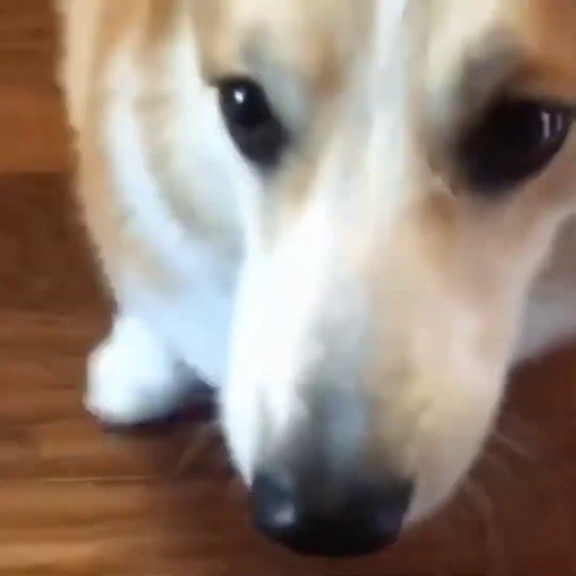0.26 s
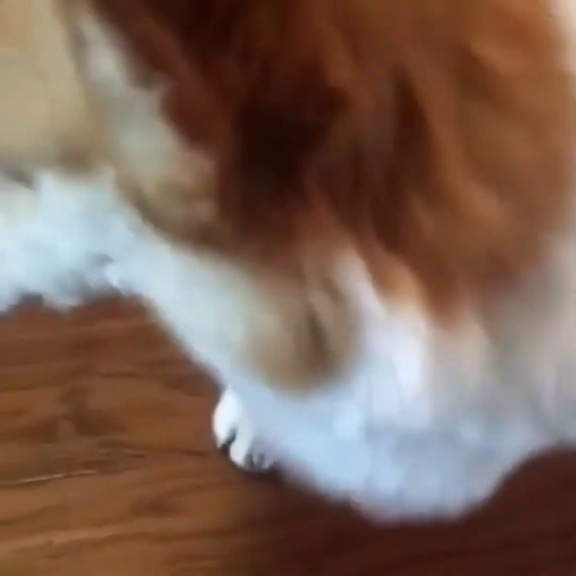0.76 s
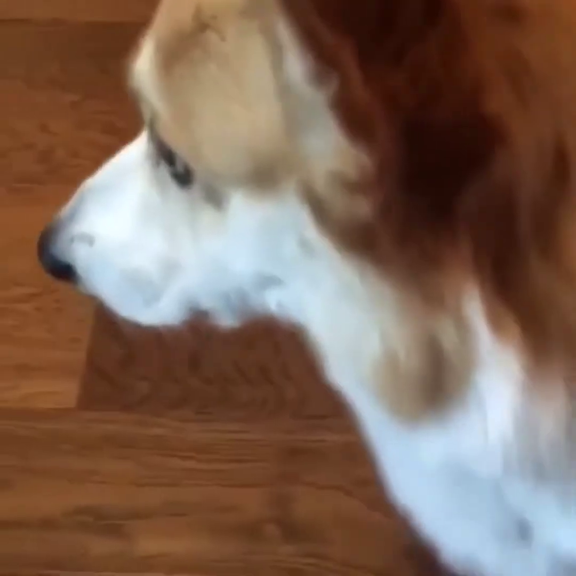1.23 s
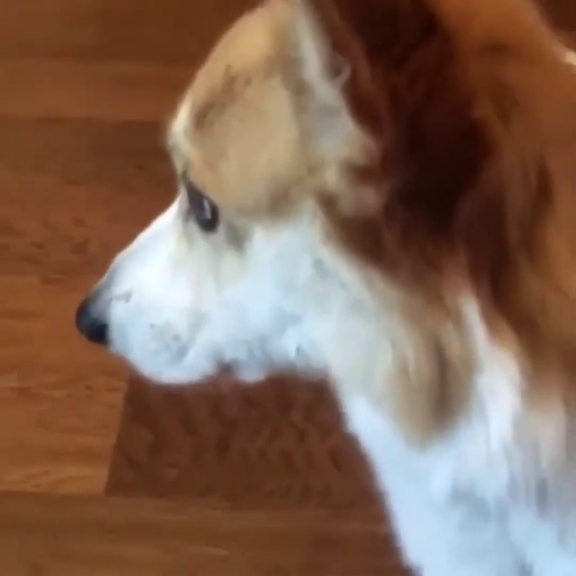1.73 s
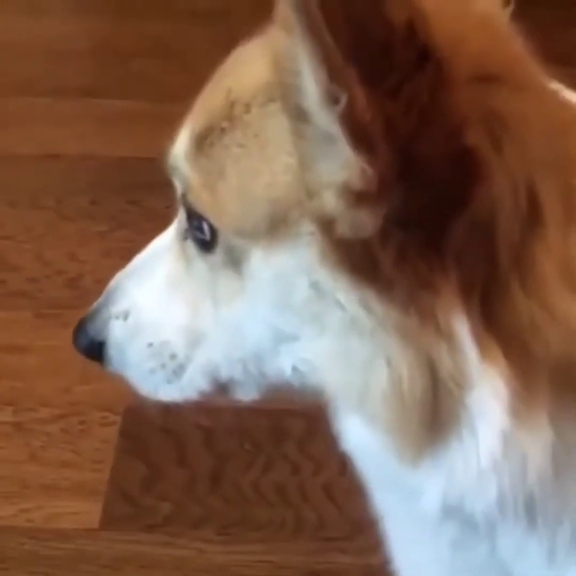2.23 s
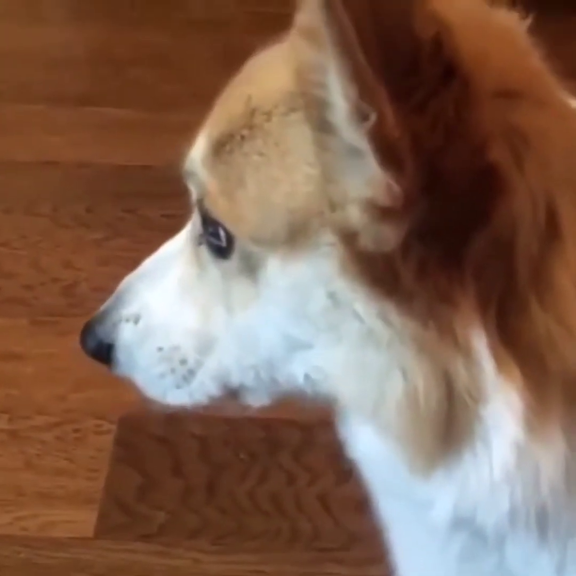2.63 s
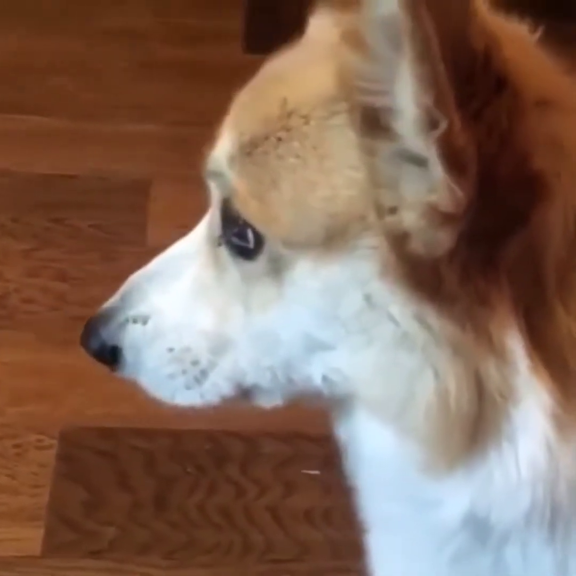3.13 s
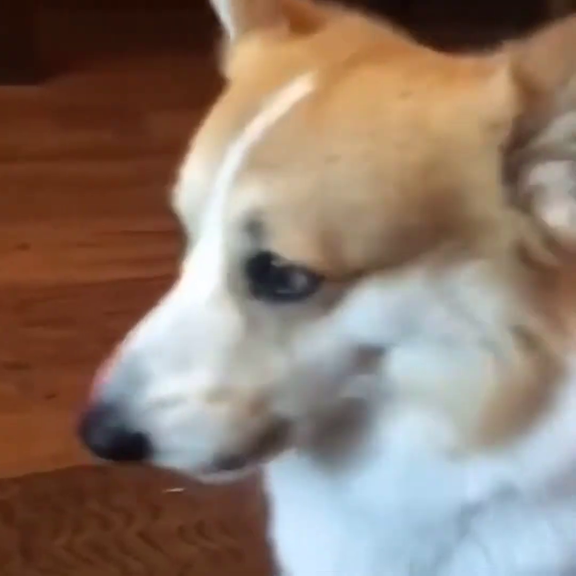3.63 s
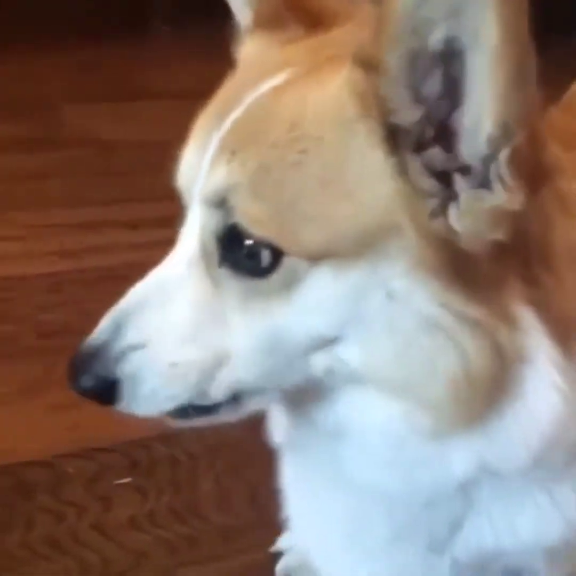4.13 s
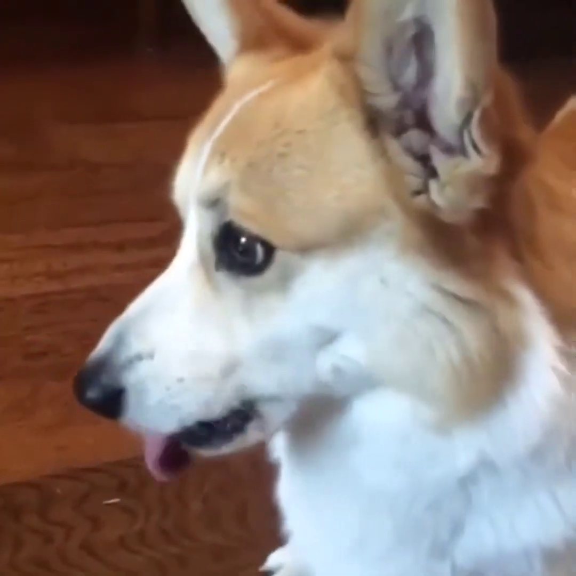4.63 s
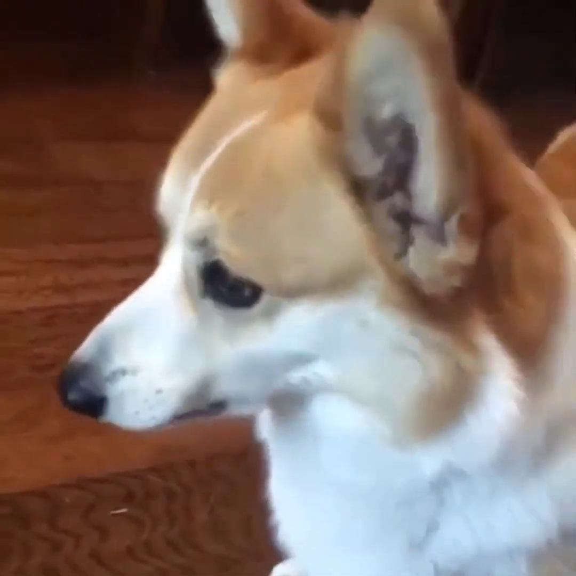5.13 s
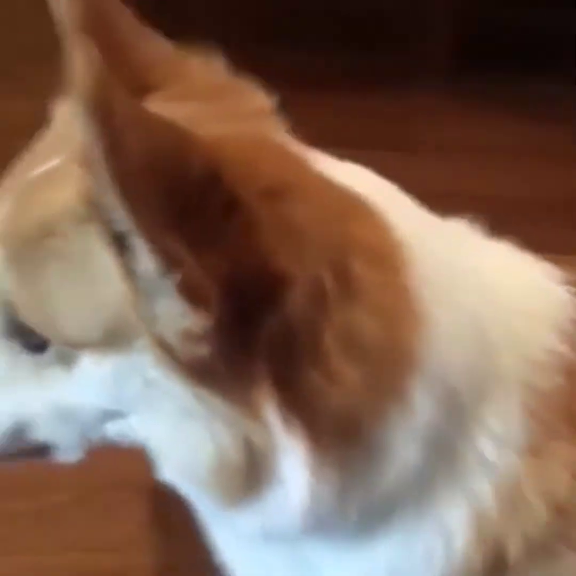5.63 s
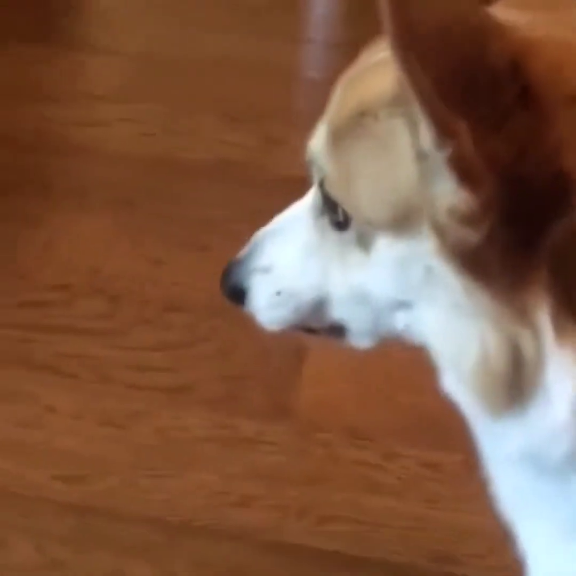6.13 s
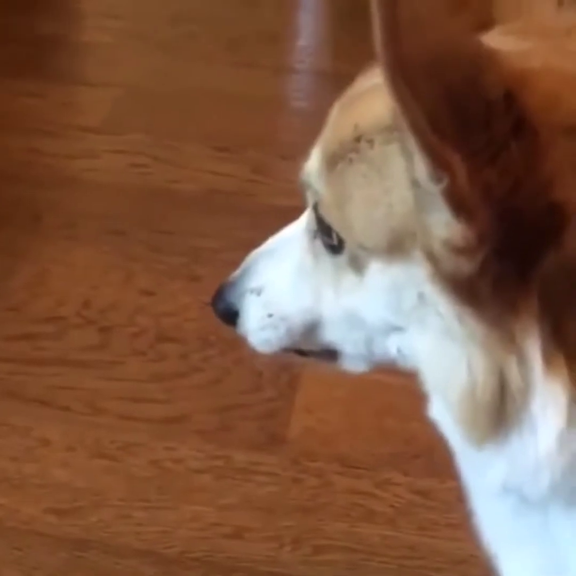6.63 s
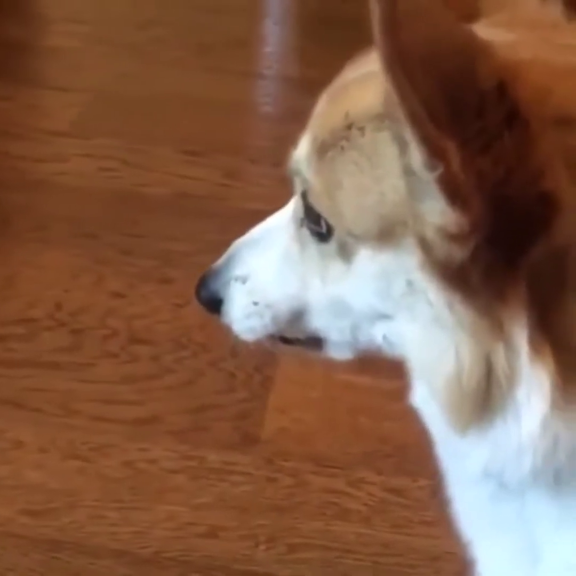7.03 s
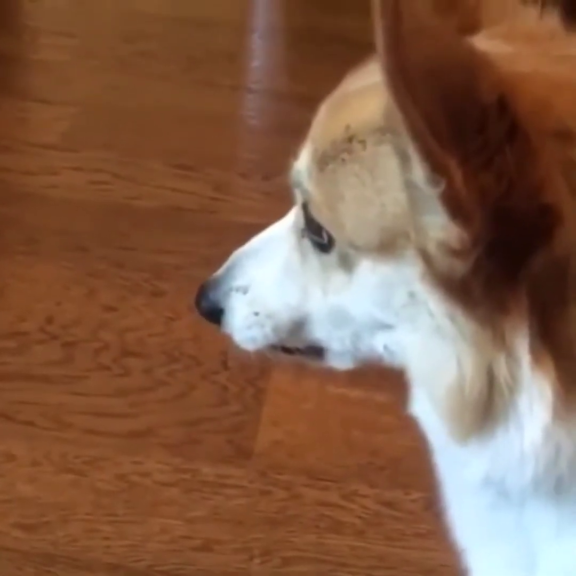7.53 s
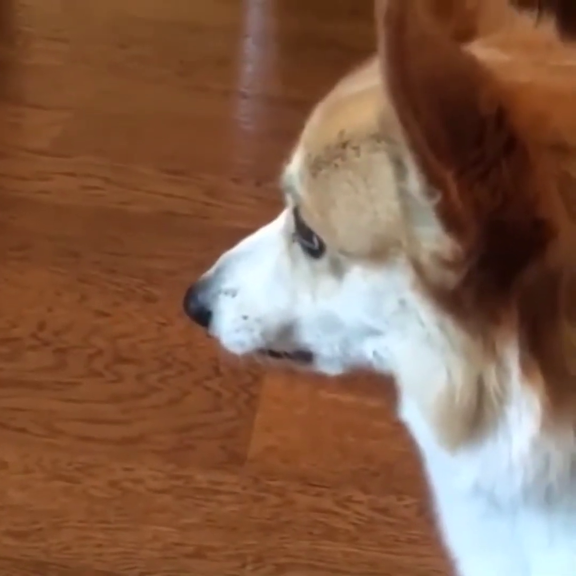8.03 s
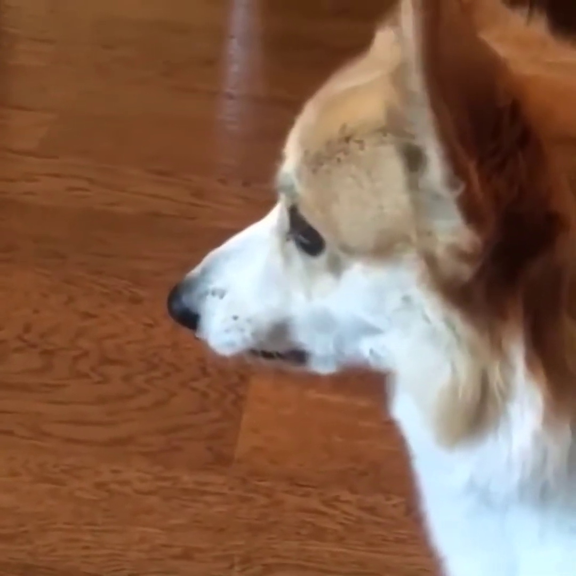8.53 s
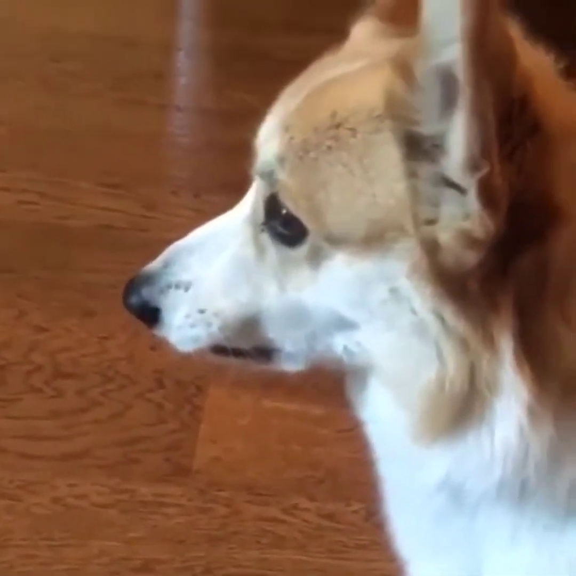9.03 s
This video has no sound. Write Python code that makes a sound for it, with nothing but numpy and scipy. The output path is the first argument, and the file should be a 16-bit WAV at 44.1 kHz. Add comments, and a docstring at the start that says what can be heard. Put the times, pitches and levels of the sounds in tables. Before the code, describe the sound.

A pet feeder motor whines and rumbles while dry kibble cracks and patters in waves into a steel bowl, then stops, leaving a quiet room.

```python
"""A motor whines and rumbles in its plastic housing as a pet feeder runs across a hard-floored room.
From the start dry food cracks in the wheel, slides down the chute in waves and patters into a steel bowl.
The motor stops, the last pieces drop and the quiet room is left with a far low rumble.
Noise bursts make the food, ringing modes the bowl, shaft-locked tones the whine, shaped noise the rest."""
import sys
import numpy as np
from scipy import signal
from scipy.fft import rfft, irfft
from scipy.io import wavfile
from scipy.ndimage import uniform_filter1d

SR = 44100
rng = np.random.default_rng(int(sys.argv[2]) if len(sys.argv) > 2 else 0)


def materialize(psi):
    """Save the field psi as 16-bit PCM at rate SR to the path in sys.argv[1].

    A 1-D psi becomes a single channel; in a 2-D psi each row is a channel.
    """
    bounded = np.clip(np.atleast_2d(psi).T, -1, 1)
    quanta = np.round(bounded * 32767).astype(np.int16)
    wavfile.write(sys.argv[1], SR, quanta)


N = 408800
T = np.arange(N) / SR
MOTOR_OFF_S = 6.955

# ringing modes of the steel bowl: mode_hz [Hz], level_db [dB], t60 [s to -60 dB]
BOWL_MODES = [(580, -14.5, 0.13), (1060.6, -8, 0.04), (1765, -11, 0.07), (2324, -2, 0.065),
              (3003, -4.5, 0.02), (4000, -10, 0.05), (4220, -5.5, 0.04), (4664, -8.5, 0.01),
              (5070, -10, 0.0251), (6320, -11, 0.04), (6550, -15.5, .1), (6885, -16, 0.01)]
# resonances of the plastic housing: centre_hz [Hz], width_hz [Hz], level_db [dB]
HOUSING_MODES = [(100, 34, -3.5), (165, 39.4, 0), (250, 51, 0), (374, 46.5, -8), (600, 104, -9)]


def undb(db):
    """Turn dB into gain."""
    return 10 ** (np.asarray(db) / 20)


def unit(x):
    """Scale to rms 1."""
    return x / np.sqrt(np.mean(x ** 2))


def curves(table):
    """Draw each column after the first as a signal in time."""
    s, *columns = np.transpose(table)
    return [np.interp(T, s, column) for column in columns]


def band(x, lo_hz, hi_hz):
    """Keep one band of the sound."""
    edges = [lo_hz, min(hi_hz, .45 * SR)]
    return signal.sosfilt(signal.butter(2, edges, "band", fs=SR, output="sos"), x)


def colour(x, table):
    """Shape the spectrum by (Hz, dB) points, joined over log frequency."""
    hz, db = np.transpose(table)
    bins = np.maximum(np.fft.rfftfreq(x.shape[-1], 1 / SR), 1)
    gain = undb(np.interp(np.log(bins), np.log(hz), db))
    return irfft(rfft(x) * gain, x.shape[-1])


def ring(x, hz, t60):
    """Ring one mode; a unit blow starts it at amplitude 1."""
    r = np.exp(-np.log(1000) / (t60 * SR))
    w = 2 * np.pi * hz / SR
    return signal.lfilter([np.sin(w)], [1, -2 * r * np.cos(w), r * r], x)


def walk(rate):
    """Drift between random levels, each held 1 / rate s and smoothed twice."""
    k = int(SR / rate)
    steps = np.repeat(rng.standard_normal(N // k + 1), k)
    return uniform_filter1d(uniform_filter1d(steps, k), k)[:N]


def blows(times, sizes, contact_s):
    """Strike a short dying burst of noise at each time."""
    marks = np.zeros(N)
    np.add.at(marks, (np.asarray(times) * SR).astype(int), sizes)
    envelope = signal.lfilter([1], [1, -np.exp(-1 / (contact_s * SR))], marks)
    return envelope * rng.standard_normal(N)


def parts(x):
    """Split a clatter into body and treble, each near rms 1."""
    # spectrum of dry food pattering: freq_hz [Hz], density_db [dB per Hz]
    patter_spectrum = [(150, -18), (300, -2), (450, -8.5), (750, -9), (1050, -6), (1500, -6), (2300, -4.5),
                       (3000, -6.5), (5000, -8.5), (8000, -12.5), (14000, -19.5)]
    x = colour(x, patter_spectrum)
    body = colour(x, [(3600, 0), (5800, -9), (7000, -30)])
    return undb(-1.5) * unit(body), undb(2.5) * unit(x - body)


def bowl(times, sizes, spot_db, contact_s):
    """Ring the steel bowl: each piece lands on another spot and wakes its own few modes."""
    out = np.zeros(N)
    for k, (hz, db, t60) in enumerate(BOWL_MODES):
        strikes = blows(times, sizes * undb(spot_db[:, k]), contact_s)
        out += undb(db) * ring(strikes, hz, t60)
    return out


def pour():
    """Gains in time of body, treble and bowl strikes: waves, spills and trickle add in power."""
    # each pocket of the wheel empties down the chute in a wave: peak_s [s], run_up_s [s],
    # body_hold_s [s], body_db [dB], treble_db [dB], bowl_db [dB re body]
    waves = [(0.174, 0.6, 0.028, -45.5, -48, -8), (1.088, .26, 0.05, -43, -46.5, -9.5),
             (2, 0.21, 0.059, -46, -48, -6), (2.923, 0.23, 0.051, -44, -46, -7),
             (3.884, .3, 0.068, -46, -51.5, -8.5), (4.767, 0.306, 0.065, -47.5, -54, -14.5),
             (5.618, 0.11, .1, -46.5, -50, -8), (6.531, 0.17, .12, -50, -58, -11.5)]
    # a handful lets go at once and scatters: start_s [s], body_db [dB], treble_db [dB], bowl_db [dB re body]
    spills = [(-.02, -42.5, -54, -6), (.36, -50, -61, -13), (.46, -52, -53, -16), (.76, -56, -54.5, -12),
              (1.44, -61, -74, -18), (2.72, -55, -62, -2), (1.66, -44.5, -46.5, -5.5),
              (3.44, -51, -61, -12), (3.53, -50.5, -53.5, -13), (4.1, -60, -64, -14),
              (4.46, -53, -54.5, -14), (5.08, -61, -81, -18), (5.33, -46, -52.5, -7.5),
              (5.47, -48.5, -62, -7), (5.69, -50, -54, -12), (5.81, -47, -65, -9.5),
              (5.9, -50.5, -64, -10.5), (6.049, -50, -67, -16), (6.71, -51.5, -67, -15),
              (6.81, -53, -68.5, -14), (7.114, -55, -68, -14.5), (7.31, -71, -82, -15)]
    # stray pieces while the wheel turns: body_db [dB], treble_db [dB], bowl_db [dB re body]
    trickle = (-64, -80, -15)
    run_up_db, treble_run_up_db = 8, 20.5  # how far below its peak a wave starts
    fall_db_s, treble_fall_db_s = 130, 116
    scatter_db_s, treble_scatter_db_s = 91, 133
    onset_s = 0.012

    # rows: body shape (dB), treble shape (dB), on/off gain, then the three levels
    rows = [(0, 0, T < MOTOR_OFF_S, *trickle)]
    for peak_s, run_up_s, hold_s, *levels in waves:
        early = np.clip((peak_s - T) / run_up_s, 0, None)
        late = np.clip(T - peak_s, 0, None)
        shape_db = -run_up_db * early - fall_db_s * np.maximum(late - hold_s, 0)
        treble_shape_db = -treble_run_up_db * early - treble_fall_db_s * late
        on = np.clip((T - peak_s + run_up_s) / onset_s, 0, 1)
        rows.append((shape_db, treble_shape_db, on, *levels))
    for start_s, *levels in spills:
        late = np.maximum(T - start_s, 0)
        on = np.clip(late / onset_s, 0, 1)
        rows.append((-scatter_db_s * late, -treble_scatter_db_s * late, on, *levels))

    power = np.full((3, N), 1e-20)
    for shape_db, treble_shape_db, on, body_db, treble_db, bowl_db in rows:
        body = (on * undb(body_db + shape_db)) ** 2
        treble = (on * undb(treble_db + treble_shape_db)) ** 2
        power = power + [body, treble, body * undb(bowl_db) ** 2]
    return np.sqrt(power)


def flow(body_gain, treble_gain, bowl_gain):
    """Hundreds of pieces a second, a few much louder than the rest; returns patter and bowl."""
    pieces_per_s, piece_spread_db, bowl_spread_db = 900, 3, 4.0
    piece_hz = np.geomspace(400, 13000, num=90)
    click_t60_s, click_db = .022, 2.5
    spot_spread_db = 4  # how unevenly one strike wakes the modes

    chance = rng.random((int(pieces_per_s * N / SR), 4))
    s = chance[:, 0] * (N - 1) / SR
    at = (s * SR).astype(int)
    size_db = np.minimum(-piece_spread_db * np.log(1 - chance[:, 1]), 9.5)
    # pieces tumble in clumps
    size_db = size_db + 1.5 * walk(18)[at]

    # every piece ticks, and clicks briefly at its own pitch
    pick = (chance[:, 3] * len(piece_hz)).astype(int)
    click = np.zeros(N)
    for k, hz in enumerate(piece_hz):
        click += ring(np.bincount(at, undb(size_db) * (pick == k), N), hz, click_t60_s)
    tick = blows(s, undb(size_db), 0.0035)
    body, treble = parts(unit(tick) + undb(click_db) * unit(click))
    patter = body_gain * body + treble_gain * treble

    # only some pieces strike bare steel squarely
    square = undb(size_db - bowl_spread_db * np.log(1 - chance[:, 2]))
    square = unit(np.minimum(square, undb(19))) * bowl_gain[at]
    spot_db = -spot_spread_db * (np.log(1 - rng.random((len(s), len(BOWL_MODES)))) + 1)
    return patter, undb(-19) * bowl(s, square, np.minimum(spot_db, 12), 0.00079)


def cracks(steel):
    """Single loud pieces, each a short splintering burst with its own pitch; returns crack and bowl."""
    # pieces cracking or landing: start_s [s], body_db [dB], treble_db [dB], pitch_hz [Hz]
    crack_table = [(.013, -41, -50, 4050), (.04, -39, -55, 2330), (.08, -36, -50, 4700),
                   (.14, -39, -50, 5070), (.23, -38, -55, 1045), (.253, -39, -58, 1200),
                   (0.361, -39.5, -50, 1804), (0.4544, -34, -38, 4160), (0.4634, -32.5, -27.5, 5990.0),
                   (.494, -41, -57, 4200), (0.5107, -41, -41, 4240), (0.5506, -40.5, -48, 1810.0),
                   (0.6409, -43, -51, 2450.0), (0.6534, -41.5, -63, 2450.0), (0.747, -34.5, -36.5, 1676),
                   (0.7544, -33.5, -42, 1162), (0.7913, -38.5, -48, 3860), (0.838, -40.5, -43, 1810.0),
                   (1.6387, -36, -32, 4200), (1.6613, -31, -35, 3910), (1.664, -36, -50, 2330),
                   (1.8407, -39.5, -40, 4010.0), (1.885, -40, -55, 2330), (1.915, -38.5, -55, 2330),
                   (2.0013, -38.5, -42, 2350), (2.6502, -46, -55, 3140.0), (2.7182, -41, -53, 2330.0),
                   (2.721, -41, -50, 5150), (2.724, -41, -55, 4050), (2.8844, -37, -40, 2330.0),
                   (2.908, -39, -50, 3000), (2.9466, -42, -37, 5080.0), (3.3485, -45.5, -53.5, 4220.0),
                   (3.4361, -37, -45.5, 4000), (3.5314, -41, -42, 4710), (3.692, -45, -58, 4050.0),
                   (3.768, -41, -60, 2320), (3.829, -41, -60, 2330), (3.8212, -38.5, -62.5, 4700),
                   (3.8756, -34.5, -35, 2970.0), (4.0934, -36.5, -50, 1307), (4.1019, -38.5, -39.5, 3730),
                   (4.261, -50, -57, 5510.0), (4.3, -47, -55, 3100), (4.3301, -41, -47.5, 2510),
                   (4.342, -40, -49, 3800), (4.4208, -43, -45, 4630), (4.4634, -40, -46, 4620),
                   (4.465, -41, -42.5, 6600), (4.5285, -41, -53, 5100), (5.1754, -46, -52, 1890.0),
                   (5.3188, -33.5, -36.5, 1120.0), (5.32, -38, -46, 6450), (5.3384, -36, -46, 2500),
                   (5.363, -37, -55, 2330), (5.377, -42, -55, 4000), (5.388, -39, -53, 4050),
                   (5.402, -42, -55, 2340), (5.472, -42, -58, 1760), (5.5812, -38, -44, 4630),
                   (5.7444, -40, -45, 4650.0), (5.9093, -44, -52, 4060), (6.4971, -34, -46, 3320.0),
                   (6.5114, -35, -47, 2500), (6.7031, -39, -48.5, 895), (6.71, -39, -58, 1596),
                   (6.722, -40, -58, 1150), (6.74, -43, -63, 1754), (6.8049, -39.5, -59, 1680.0),
                   (7.0319, -46.5, -52, 2600), (7.0803, -48, -68.0, 3500), (7.113, -37, -49, 1636),
                   (7.128, -41, -58, 1980), (7.1499, -42.5, -62, 2290), (7.225, -44.5, -49, 1765),
                   (7.2716, -48.5, -48, 2540.0), (7.3046, -49, -66, 1760), (7.318, -46.5, -70, 1060),
                   (7.49, -60, -82, 950)]
    note_db, note_decay_s, attack_s = -2, .007, .002
    focus_db = 7.5  # how far the burst is turned down two octaves below and one above its pitch
    off_pitch_db_oct = 32  # a crack wakes the bowl modes near its own pitch most

    out = np.zeros(N)
    t = np.arange(2048) / SR
    attack = 1 - np.exp(-t / attack_s)
    for s, body_db, treble_db, hz in crack_table:
        body, treble = parts(rng.standard_normal(len(t)))
        body = unit(colour(body, [(hz / 4, -focus_db), (hz, 0), (hz * 2, -focus_db)]))
        note = undb(note_db) * np.sin(2 * np.pi * hz * t) * np.exp(-t / note_decay_s)
        burst = undb(body_db) * (1.09 * body * np.exp(-t / 0.0058) + note)
        burst += undb(treble_db + 2.5) * treble * np.exp(-t / 0.0035)
        i = int(s * SR)
        out[i:i + len(t)] += burst * attack

    s, body_db, _, hz = np.transpose(crack_table)
    spot_db = -off_pitch_db_oct * np.abs(np.log2(np.transpose(BOWL_MODES)[0] / hz[:, None]))
    sizes = undb(body_db - 7.5) * steel[(s * SR).astype(int)]
    return out, bowl(s, sizes, spot_db, 0.0019)


def knocks():
    """Dull knocks: a soft push rings one short note and the housing."""
    # knocks through the housing: start_s [s], level_db [dB, relative], pitch_hz [Hz]
    knock_table = [(0.089, -39, 245), (0.456, -32.5, 149), (.458, -34, 250), (0.479, -30.5, 256),
                   (0.768, -36.5, 243), (1.356, -38.5, 550), (1.443, -38, 169), (1.461, -35.5, 249),
                   (1.648, -41, 270), (1.818, -47, 172), (1.969, -36, 251), (2.076, -40, 259),
                   (2.254, -42, 171), (3.133, -42, 171), (3.363, -42.5, 151), (3.453, -40.5, 159),
                   (3.599, -44, 105.7), (3.769, -41.5, 265), (4.11, -37, 256), (4.607, -44, 143),
                   (5.083, -42.5, 105.2), (5.332, -35, 251), (5.582, -43, 256), (5.726, -42.5, 151),
                   (6.524, -42, 94.3), (6.811, -40.5, 163), (6.955, -45, 560), (7.113, -46, 540),
                   (7.306, -50, 570), (7.395, -57, 600), (7.489, -59, 600), (7.555, -63, 540)]
    out = np.zeros(N)
    t = np.arange(int(.3 * SR)) / SR
    for s, db, hz in knock_table:
        note = np.sin(2 * np.pi * hz * t) * np.exp(-t * hz / 5)
        for f, width_hz, mode_db in HOUSING_MODES:
            tone = np.sin(2 * np.pi * (f * t + rng.random()))
            note += undb(mode_db - 6.5) * tone * np.exp(-np.pi * width_hz * .4 * t)
        i = int(s * SR)
        out[i:i + len(t)] += undb(db - 2.5) * note * (1 - np.exp(-t / 0.0017))
    return out


def motor():
    """Gear whine locked to the shaft over gear hiss and the rumble of the housing."""
    # motor shaft, its speed drifting up and down: time_s [s], speed [turns per second, before wobble]
    shaft = [(0, 34.2), (.6, 34.4), (1.2, 35.05), (1.6, 35), (2.45, 35.55), (2.7, 35.4), (3.2, 34.4),
             (3.6, 34.9), (4.2, 35.2), (5.3, 35.3), (5.9, 35.1), (6.25, 35.37), (6.85, 35.1)]
    # low shaft orders, whine of 30 gear teeth a turn, overtones and sidebands: order [multiple of the shaft]
    orders = [3, 9, 18, 29, 30, 31, 32, 33, 59, 61, 89, 90, 91, 119, 120, 150]
    # usual level of each order: level_db [dB rms]
    orders_db = [-70, -74.5, -77.5, -76, -66, -72.5, -75.5, -77.5, -81.5, -81, -75, -70.5, -75.5, -81, -78,
                 -86]
    # loudness of the whine: time_s [s], level_db [dB over usual],
    # tilt_db [dB added near order 90; those near 120 go the other way, less far]
    whine_swell = [(0, -1.5, 3), (1.4, -1, 0), (2.4, 1, .5), (3.3, -1.5, 1), (5.3, -2, -1), (6, -2, -5),
                   (7, -2.5, -5)]
    # spectrum of the gear hiss: freq_hz [Hz], density_db [dB per Hz]
    hiss_spectrum = [(250, -21), (500, -2.5), (1200, 2), (1600, -5.5), (2300, -4), (2800, -12), (4300, -10),
                     (5500, -22.5), (10000, -26.5)]
    # loudness of the housing rumble: time_s [s], level_db [dB, relative]
    rumble_swell = [(0.0, -56), (.55, -58), (.7, -63), (.9, -57), (2.12, -59.5), (2.37, -64), (3.3, -55),
                    (3.6, -59), (4.2, -58), (4.4, -60), (5.16, -60), (5.65, -55), (6.03, -61),
                    (6.72, -56.5), (7.1, -62)]
    hiss_db, run_down_s = -67, 0.048

    turns = np.cumsum(curves(shaft)[0] * (1 + .0012 * walk(30))) / SR
    swell_db, tilt_db = curves(whine_swell)
    whine = np.zeros(N)
    for k, db in zip(orders, orders_db):
        tilt = (abs(k - 90) < 3) - .6 * (abs(k - 120) < 2)
        level = undb(db + tilt * tilt_db + 2.5 * walk(20))
        # sidebands nearly in step with their tone make it throb once a turn
        whine += level * np.sqrt(2) * np.cos(2 * np.pi * k * turns + .4 * k * k)

    # the teeth hiss hardest at one point of each turn
    hiss = unit(colour(rng.standard_normal(N), hiss_spectrum))
    hiss = hiss * (1 + 0.24 * np.sin(2 * np.pi * turns))

    # gears shake the housing unevenly
    shake = rng.standard_normal(N) * undb(4.6 * walk(18))
    rumble = np.zeros(N)
    for hz, width_hz, db in HOUSING_MODES:
        rumble += undb(db) * unit(band(shake, hz - width_hz / 2, hz + width_hz / 2))
    rumble = undb(curves(rumble_swell)[0] + 1.0) * unit(rumble)

    running = np.exp(-np.maximum(T - MOTOR_OFF_S, 0) / run_down_s)
    return running * (undb(swell_db) * whine + undb(hiss_db) * hiss + rumble)


def room(x):
    """Four diffuse echoes, the treble dying first, blend in slowly wandering shares."""
    # decay of the room: freq_hz [Hz], t60 [s to -60 dB]
    room_decay = [(200, 0.47), (1000, 0.48), (4000, 0.37), (12000, 0.27)]
    t = np.arange(int(.8 * SR)) / SR
    hz, t60 = np.transpose(room_decay)
    tails = np.zeros((4, len(t)))
    for f in 60 * 2. ** np.arange(8):  # octave bands
        fade = np.exp(-np.log(1000) * t / np.interp(np.log(f), np.log(hz), t60))
        fade = fade * (1 - np.exp(-t / 0.0046))
        noise = band(rng.standard_normal(tails.shape), f, 2 * f)
        tails += noise * fade / np.sqrt(np.sum(fade ** 2))

    # the squared shares always add up to 1
    share = np.array([walk(20) for _ in tails])
    share = share / np.sqrt(np.sum(share ** 2, axis=0))
    out = np.zeros(N)
    for weight, tail in zip(share, tails):
        out += signal.fftconvolve(x * weight, tail / np.sqrt(np.sum(tail ** 2)))[:N]
    return out


def quiet():
    """Room hush of shaped noise with a wavering far low rumble."""
    # spectrum of the hush: freq_hz [Hz], density_db [dB per Hz]
    hush_spectrum = [(15, -36), (28, -22), (50, -5.5), (80, -14.5), (130, -19), (180, -26), (260, -22.5),
                     (400, -33), (600, -35), (1500, -42), (5000, -48.5), (14300, -51.5)]
    # the rumble swells and sinks: time_s [s], level_db [dB over usual, before wavering]
    rumble_swell = [(0, -1.5), (8.15, -1), (8.4, 4.5), (8.65, -2), (9.27, -5)]
    hush = unit(colour(rng.standard_normal(N), hush_spectrum))
    low = colour(hush, [(60, 0), (90, -30)])
    wavering = undb(curves(rumble_swell)[0] + 1.5 * walk(6.7))
    return undb(-65) * (hush - low + low * wavering)


def scene():
    """The feeder is far, so echo carries much of it; only the top treble differs left and right."""
    # treble noise that sets left apart from right: freq_hz [Hz], level_db [dB]
    side_spectrum = [(3000, -71), (4500, -12.5), (7000, -18), (10000, -8.5), (13000, -6.5)]
    gains = pour()
    patter, ping = flow(*gains)
    # a crack rings the bowl as far as the food around it meets bare steel
    crack, clang = cracks(gains[2] / gains[0])
    food, steel, knock = patter + crack, ping + clang, knocks()

    direct = undb(-2.5) * food + undb(-2.5) * steel + knock
    echo = room(undb(-5.5) * food + undb(-7.5) * steel + undb(-10.0) * knock)
    mid = direct + motor() + quiet() + echo

    # the side noise follows the treble of the food
    treble = uniform_filter1d(np.abs(band(food, 7700, 13000)), size=256)
    side = colour(rng.standard_normal(N) * treble, side_spectrum)
    return np.array([mid + side, mid - side])


def record(dry):
    """The phone cuts the top with a steep low-pass."""
    top_hz = 14050
    return signal.sosfilt(signal.ellip(10, .2, 70, top_hz, fs=SR, output="sos"), dry)


dry = scene()
out = record(dry)
materialize(out)
```